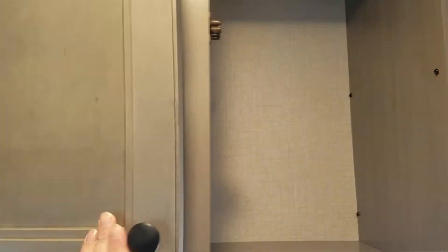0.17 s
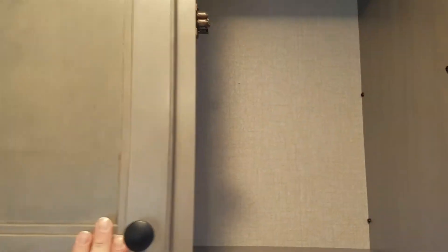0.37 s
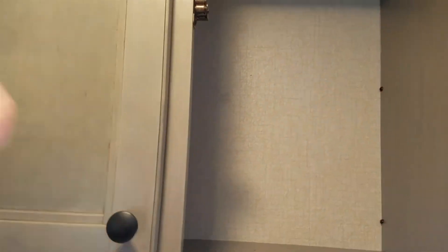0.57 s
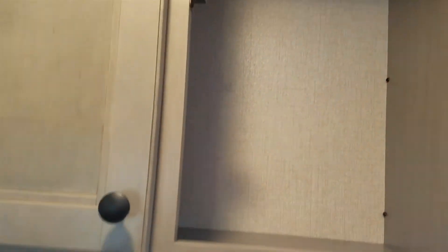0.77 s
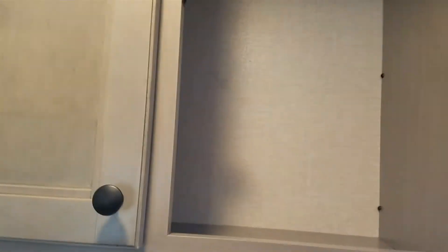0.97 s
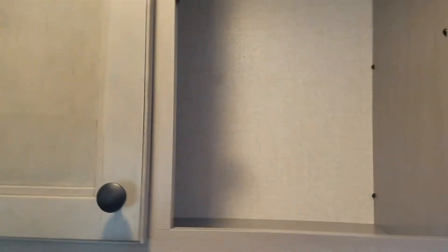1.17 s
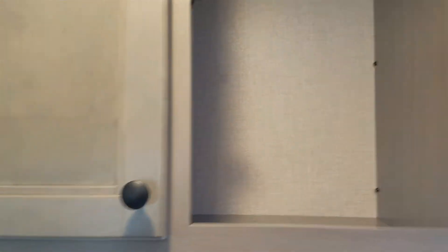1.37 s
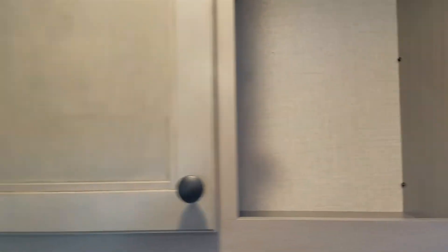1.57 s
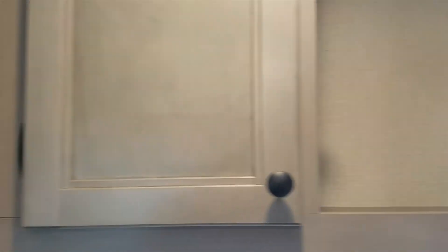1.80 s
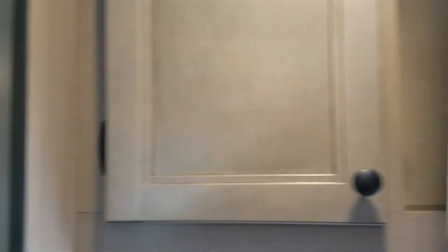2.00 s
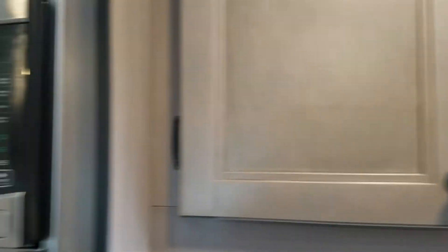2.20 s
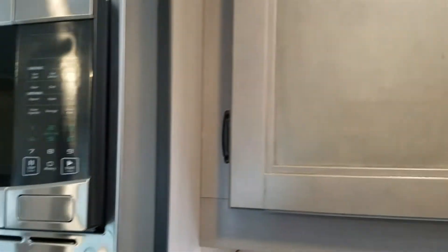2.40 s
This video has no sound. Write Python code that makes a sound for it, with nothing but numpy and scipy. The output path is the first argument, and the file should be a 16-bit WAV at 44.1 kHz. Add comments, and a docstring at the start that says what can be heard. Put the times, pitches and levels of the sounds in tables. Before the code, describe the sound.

Two thin wooden cupboard doors shut about two seconds apart, each a hard, bouncing knock with a catch snap and short room tail, heard close on a handheld phone with handling ticks and soft bumps between.

```python
"""Two cabinet doors in a trailer kitchen

Two light doors are pushed shut close to a hand-held phone. Each snaps into its spring catch, hits the
frame and bounces: decaying panel and catch modes, a noise crack and a room tail, then boom in the thin walls.
Finger clicks are short sine bursts, finger slides grainy noise, soft bumps low swelling sines with a knock.
Shaped noise and wavering bands make the faint room hum; a limiter holds the knocks down."""
import sys
import numpy as np
from scipy import signal
from scipy.fft import rfft, irfft
from scipy.io import wavfile
from scipy.ndimage import uniform_filter1d

SR = 44100
rng = np.random.default_rng(int(sys.argv[2]) if len(sys.argv) > 2 else 0)


def decibels_to_gain(level_db):
    """Convert a level in decibels to a linear amplitude gain (20 dB per decade)."""
    exponent = np.asarray(level_db, float) / 20
    return 10 ** exponent


def master_out(mix):
    """Clip the mix to full scale and print it as 16-bit PCM to the path in sys.argv[1]."""
    frames = np.transpose(np.atleast_2d(mix))
    ceiling = np.clip(frames, -1, 1)
    pcm = np.round(ceiling * 32767).astype(np.int16)
    wavfile.write(sys.argv[1], SR, pcm)


N = 108045  # length in samples

# How alike the two microphone ports hear doors and knocks. Each row: frequency in Hz, likeness from 0 to 1.
DOOR_LIKENESS = [(100, 1), (300, .98), (700, .8), (1500, .5), (3000, .4), (14000, .4)]
# How alike the ports hear room air and finger slides. Each row: frequency in Hz, likeness from 0 to 1.
AIR_LIKENESS = [(60, 1), (150, 0.42), (300, 1), (700, 0.35), (1500, 0.15), (5000, 0.1), (14000, .1)]
DOOR_LAG_S, AIR_LAG_S = 0.00017, 0.00044  # the left port hears later


def evened(x):
    """Scales to rms 1."""
    return x / np.sqrt(np.mean(x ** 2) + 1e-20)


def read(points, hz):
    """Table lookup on a log-frequency axis."""
    f, value = np.transpose(points)
    return np.interp(np.log(hz + 1), np.log(f + 1), value)


def add(mix, start_s, sound):
    """Mixes a sound in at its start time, cut off at the end of the mix."""
    part = mix[..., round(start_s * SR):][..., :sound.shape[-1]]
    part += sound[..., :part.shape[-1]]


def colour(noise, table):
    """Noise given the table's spectrum, rms 1."""
    hz = np.fft.rfftfreq(len(noise), 1 / SR)
    return evened(irfft(rfft(noise) * decibels_to_gain(read(table, hz)), len(noise)))


def ports(a, b, likeness, lag_s):
    """Two microphone ports: the left hears a, the right hears a blended with b, earlier by the lag."""
    hz = np.fft.rfftfreq(len(a), 1 / SR)
    c = np.clip(read(likeness, hz), 0, 1)
    blend = c * rfft(a) + np.sqrt(1 - c ** 2) * rfft(b)
    right = irfft(blend * np.exp(2j * np.pi * hz * lag_s), len(a))
    return np.array([a, right])


def pan(x, db):
    """Left-right balance; positive leans left."""
    return x * decibels_to_gain(np.array([[db / 2], [-db / 2]]))


def resonate(x, hz, width):
    """A resonance applied twice, rms 1; width in Hz is that of one pass."""
    b, a = signal.iirpeak(hz, hz / width, SR)
    twice = signal.lfilter(b, a, signal.lfilter(b, a, x))
    return evened(twice)


def air():
    """Room air is broadband noise; narrow noise bands that waver in level make the hum in it."""
    # Spectrum of the air. Each row: frequency in Hz, relative level in dB per Hz.
    air_tone = [(20, -28), (50, -3), (84, -5.5), (170, -18.5), (350, -4), (480, -10.5), (1140, -11),
                (1350, -15), (2000, -15.5), (4000, -29), (7100, -42), (12000, -62)]
    # Air level between 200 and 3000 Hz, before the port blend. Each row: time in seconds, rms in dB.
    air_level = [(0.0, -48.5), (0.14, -46.5), (0.28, -51), (0.38, -48), (0.57, -52.5), (0.81, -53),
                 (0.93, -49.5), (1.3, -54), (2.01, -50.5), (2.16, -50.5), (2.31, -50), (2.45, -53)]
    # Hum bands. Each row: centre in Hz, width of one filter pass in Hz, level in dB before waver and swell.
    hum_bands = [(79.9, 15, -63.5), (331, 23, -69.5), (591, 38, -76), (875, 270, -71), (1355, 183, -63)]
    # Swell of the hum bands above 500 Hz. Each row: time in seconds, change in dB.
    hum_swell = [(0, -6), (.1, 14), (.17, 16), (.22, -13.5), (.5, 9), (0.618, -18), (.82, -16), (.92, 10),
                 (1.0, -1.5), (1.25, 4), (1.4, -14), (1.58, -8), (1.65, 5.5), (1.8, 12), (1.9, -10),
                 (2.1, -10), (2.3, 13), (2.45, -31)]
    waver_db, waver_s = 3, 0.08  # rms depth, smoothing time
    now = np.arange(N) / SR
    level = np.interp(now, *np.transpose(air_level))
    swell = np.interp(now, *np.transpose(hum_swell))
    wavers = []  # shared by both ports
    for noise in rng.standard_normal((len(hum_bands), N)):
        slow = uniform_filter1d(noise, round(waver_s * SR))
        wavers.append(evened(uniform_filter1d(slow, 1000)))
    middle = signal.butter(4, [200, 3000], "band", fs=SR, output="sos")
    pair = []
    for noise in rng.standard_normal((2, N)):
        bed = colour(noise, air_tone)
        bed = bed / np.std(signal.sosfilt(middle, bed))
        sound = bed * decibels_to_gain(level)
        for (hz, width, db), waver in zip(hum_bands, wavers):
            band_db = db + waver_db * waver + (hz > 500) * swell
            sound = sound + resonate(noise, hz, width) * decibels_to_gain(band_db)
        pair.append(sound)
    return ports(*pair, AIR_LIKENESS, AIR_LAG_S)


def clicks():
    """A finger clicks on the phone: a few cycles at the click's pitch with a sharp noise edge."""
    # Each row: start in seconds, envelope peak in dB before panning, pitch in Hz, left over right in dB.
    click_list = [(0.776, -36, 4540, 28), (0.851, -32, 1300, 12.5), (.975, -45.5, 4830, 12),
                  (0.995, -38, 2680, -13.5), (1.011, -38, 9600, -16), (1.02, -42, 2770, 31),
                  (1.027, -29, 2220, -15), (1.032, -45.5, 6400, -9), (1.0407, -29, 2930, -18),
                  (1.054, -19.5, 2360, -12.5), (1.074, -46, 9800, -2), (2.048, -30.5, 2930, 7),
                  (0.062, -37.5, 2580, -7), (1.546, -44.5, 9200, -4), (2.263, -46.5, 7000, 2)]
    width, edge_db = 0.6, -11  # damping against pitch; edge against the click's level
    out, t = np.zeros((2, N)), np.arange(300) / SR
    for s, db, hz, pan_db in click_list:
        u = np.pi * width * hz * t
        body = np.sin(2 * np.pi * hz * t) * u * np.exp(1 - u)
        edge = decibels_to_gain(edge_db) * rng.standard_normal((2, len(t))) * np.exp(-t / 0.00021)
        add(out, s, decibels_to_gain(db) * pan(body + edge, pan_db))
    return out


def bumps():
    """A soft bump is a low push that swells and dies, with a dull noise knock on top."""
    # Each row: start in seconds, push peak in dB before panning, pitch in Hz, time to the peak in seconds,
    # knock level in dB before its rise and decay, left over right of the push in dB.
    bump_list = [(0.063, -32.5, 68, 0.0057, -40, 2), (0.22, -32.5, 152, 0.0097, -57, 1.5),
                 (0.422, -33, 58.8, 0.029, -65, 1), (0.726, -40, 87, 0.0066, -64, 16),
                 (.778, -37.5, 65, 0.006, -49, 20), (1.031, -47.5, 70, 0.011, -42, -15),
                 (1.23, -39.5, 80.8, 0.023, -40.5, -0.5), (1.262, -42, 84.3, .015, -48, -0.5),
                 (1.436, -35.5, 145, 0.02, -58.5, 1.5), (1.44, -45.5, 326, 0.014, -45, 0),
                 (1.911, -54, 87, 0.019, -45, 0), (1.981, -48, 97, 0.0058, -32.5, 2),
                 (2.025, -34, 61, 0.016, -55, -1.5), (2.188, -45, 55.3, 0.027, -65, 1),
                 (2.4, -47, 51.4, 0.033, -47.5, 0)]
    # Spectrum of the knock. Each row: frequency in Hz, relative level in dB per Hz.
    knock_tone = [(88, -22), (150, -6), (492, -7), (1540, -14), (2010, -12.5), (2530, -22.5), (2860, -23.5),
                  (6000, -42.5), (7800, -83.5), (13200, -120)]
    knock_t60_s, knock_rise_s = 0.17, 0.0012
    out, t = np.zeros((2, N)), np.arange(SR // 4) / SR
    for s, db, hz, peak_s, knock_db, pan_db in bump_list:
        swell = t / peak_s * np.exp(1 - t / peak_s)
        push = np.sin(2 * np.pi * hz * t) * decibels_to_gain(db) * swell
        a, b = (colour(noise, knock_tone) for noise in rng.standard_normal((2, len(t))))
        shape = decibels_to_gain(knock_db - 60 * t / knock_t60_s) * (1 - np.exp(-t / knock_rise_s))
        knock = ports(a, b, DOOR_LIKENESS, DOOR_LAG_S) * shape
        add(out, s, pan(push, pan_db) + knock)
    return out


def ring(modes, t, rise_s, spread_db=1.5):
    """Decaying modes after one blow; random mode levels and signs make each blow a little different."""
    hz, db, t60 = np.transpose(modes)[:, :, None]
    luck = rng.standard_normal((len(modes), 2))
    wave = np.sin(2 * np.pi * hz * t) * np.sign(luck[:, :1])
    decay = decibels_to_gain(db + spread_db * luck[:, 1:] - 60 * t / t60)
    return (decay * wave).sum(0) * (1 - np.exp(-t / rise_s))


def room(x):
    """Direct sound and a dense tail whose bands die at their own speed, heard by both ports."""
    # Decay of the room. Each row: frequency in Hz, time to fall 60 dB in seconds.
    room_t60 = [(100, 0.28), (260, 0.34), (700, 0.26), (1840, 0.31), (4850, 0.24), (12800, 0.23)]
    # Tail against direct sound. Each row: frequency in Hz, level in dB.
    tail_send = [(60, -16), (250, -7.5), (700, -4), (2000, -3.5), (6000, -2.5), (15000, -6)]
    # Balance of the doors at the microphone. Each row: frequency in Hz, left over right in dB.
    door_balance = [(60, 1), (110, 0.5), (200, 0.0), (380, -0.5), (700, 0.0), (1290, 1), (2380, -4),
                    (4400, 0.5), (8120, 1.5), (15000, -2)]
    size = SR // 2
    hz, t, z = signal.stft(rng.standard_normal((2, size)), SR, nperseg=256)
    t60 = read(room_t60, hz)[:, None]
    decay = decibels_to_gain(read(tail_send, hz)[:, None] - 60 * t / t60)
    z = z * decay * np.sqrt(6 * np.log(10) / (t60 * SR))  # long and short decays carry equal energy
    fade_in = np.minimum(np.arange(size) / (0.0032 * SR), 1)
    tail = signal.istft(z, SR, nperseg=256)[1][:, :size] * fade_in
    wet = x + signal.fftconvolve(x[:1], tail, axes=1)[:, :N]  # the first row feeds both tails
    a, b = np.pad(wet, ((0, 0), (0, 4096)))
    balance_db = read(door_balance, np.fft.rfftfreq(len(a), 1 / SR))
    tilt = decibels_to_gain(np.outer([0.5, -0.5], balance_db))
    heard = ports(a, b, DOOR_LIKENESS, DOOR_LAG_S)
    return irfft(rfft(heard) * tilt, len(a))[:, :N]


def doors():
    """Every blow rings panel and spring catch and cracks; each door has a room tail of its own."""
    # Blows of each door. Each row: start in seconds, panel, catch and crack gain in dB.
    first_blows = [(.2295, -11.5, -37.5, -11.5), (.2325, -6, -61.5, -11.5), (.249, -7, -25, -6),
                   (.266, -9, -47, -42), (.284, -12.5, -52.5, -24), (.302, -16, -43, -35),
                   (.311, -17.5, -60.5, -36.5), (.327, -22, -46, -47)]
    second_blows = [(2.0895, -30, -18.5, -10.5), (2.098, -24, -35, -16.5), (2.1095, -13, -21, -14),
                    (2.1175, -11.5, -41, -9), (2.125, -12, -55, -20), (2.144, -15.5, -56, -26),
                    (2.153, -15, -56, -20.5)]
    # Panel modes. Each row: frequency in Hz, level in dB before blow gain and spread, t60 in seconds.
    first_panel = [(98.9, -4, 0.21), (116.5, 2, 0.09), (178.6, -10, 0.28), (233.7, -2, 0.31),
                   (305, -10.5, 0.16), (390.5, -14.5, 0.22), (527, -3, 0.033), (661, -9.5, 0.12),
                   (836.6, -8.5, 0.091), (1080, -28, 0.065), (1300, -27, 0.041), (2008, -32.5, 0.077),
                   (2455, -11.5, 0.021)]
    second_panel = [(143.3, 0, 0.09), (214, -17, 0.22), (325.2, 1, 0.12), (369, -1, 0.086),
                    (419.6, -2.5, 0.083), (553, 2, 0.052), (602.6, -3.5, 0.097), (647, -8, 0.092),
                    (807, -6.5, 0.1), (894, -15.5, 0.12), (1125, -35, .06), (1404, -27, 0.059),
                    (1900, -15, 0.064)]
    # Modes of the spring catch. Each row: frequency in Hz, level in dB as above, t60 in seconds.
    catch_modes = [(4164, 6, 0.017), (5480, -6.5, 0.01), (8000, -10.5, 0.017), (10570, -16, 0.009)]
    # Spectrum of each crack against the frame. Each row: frequency in Hz, relative level in dB per Hz.
    first_crack = [(120, -31), (200, 3.5), (420, -22.5), (849, -9.5), (1040, -13), (1880, -15),
                   (3230, -23.5), (4030, -27), (8610, -50.5), (15000, -37.5), (16800, -64)]
    second_crack = [(120, -33), (200, -12), (369, -8), (692, -11), (1300, -8), (1510, -12), (2890, -18),
                    (4180, -23.5), (8940, -46), (15000, -42), (16800, -52)]
    panel_rise_s, catch_rise_s = 0.002, 0.0001
    crack_rise_s, crack_t60_s, crack_grain_db = 0.00059, 0.055, 1.5
    out, t = np.zeros((2, N)), np.arange(SR // 2) / SR
    crack_shape = decibels_to_gain(-60 * t / crack_t60_s) * (1 - np.exp(-t / crack_rise_s))
    both_doors = ((first_blows, first_panel, first_crack), (second_blows, second_panel, second_crack))
    for blows, panel_modes, crack_tone in both_doors:
        door = np.zeros((2, N))  # main sound, and the part blended into the right port
        for s, panel_db, catch_db, crack_db in blows:
            grain = decibels_to_gain(crack_grain_db * rng.exponential(1, len(t)))
            grains = rng.standard_normal((2, len(t))) * grain
            crack = np.array([colour(noise, crack_tone) for noise in grains])
            crack = crack * decibels_to_gain(crack_db) * crack_shape
            panel = decibels_to_gain(panel_db) * ring(panel_modes, t, panel_rise_s) * [[1], [0]]  # main row only
            catch = decibels_to_gain(catch_db) * ring(catch_modes, t, catch_rise_s)
            add(door, s, panel + catch + crack)
        out = out + room(door)
    return out


def booms():
    """The thin walls shake after each door: low resonant noise that dies away."""
    # Each row: start in seconds, level in dB before rise and decay, pitch in Hz, t60 in seconds.
    boom_list = [(.235, -27, 66, 1.53), (2.101, -30, 57, 0.74)]
    width_hz = 85  # of one filter pass
    out, t = np.zeros(N), np.arange(SR) / SR
    for s, db, hz, t60 in boom_list:
        shake = resonate(rng.standard_normal(SR), hz, width_hz)
        shape = decibels_to_gain(db - 60 * t / t60) * (1 - np.exp(-t / 0.005))
        add(out, s, shake * shape)
    return out


def slides():
    """Skin rubs on the phone: a grainy hiss, rising and fading."""
    # Each row: start in seconds, rise in seconds, time to fade by 14 dB in seconds, level in dB before
    # shape and panning, left over right in dB, brightness in dB per octave.
    slide_list = [(0.7752, 0.00072, 0.082, -44, 10.5, 2), (0.854, 0.0012, 0.013, -43.5, 12, 1),
                  (0.966, 0.0091, 0.038, -58.5, 4, 7.5), (1.002, 0.01, 0.058, -42, 2, -3.5),
                  (1.53, 0.019, 0.07, -43, 3.5, -1.5), (1.981, .003, 0.11, -45.5, 3, -3),
                  (2.039, 0.015, 0.055, -45.5, 3, 0)]
    # Spectrum of rubbing before the brightness. Each row: frequency in Hz, relative level in dB per Hz.
    slide_tone = [(300, -14), (700, 0), (1500, -1.5), (3000, -1.5), (6000, -11), (9000, -25), (12000, -27),
                  (16000, -28)]
    grain_db = 2.5
    out = np.zeros((2, N))
    for s, rise_s, length_s, db, pan_db, bright_db in slide_list:
        t = np.arange(0, 2 * length_s, 1 / SR)
        tone = [(hz, level + bright_db * np.log2(hz / 3000)) for hz, level in slide_tone]
        pair = []
        for _ in range(2):
            grain = decibels_to_gain(grain_db * rng.exponential(1, len(t)))
            pair.append(colour(rng.standard_normal(len(t)) * grain, tone))
        shape = np.minimum(t / rise_s, 1) * decibels_to_gain(-14 * (t / length_s) ** 2)
        rub = shape * ports(*pair, AIR_LIKENESS, AIR_LAG_S)
        add(out, s, decibels_to_gain(db) * pan(rub, pan_db))
    return out


def scene():
    """All sources in the kitchen."""
    return air() + clicks() + bumps() + doors() + booms() + slides()


def hiss(shape):
    """Microphone hiss: steady noise, independent in each port."""
    # Each row: frequency in Hz, relative level in dB per Hz.
    hiss_tone = [(3000, -12), (7000, -8), (10000, -3), (13000, 1.5), (15500, 4.5), (17000, -3)]
    return decibels_to_gain(-72) * np.array([colour(noise, hiss_tone) for noise in rng.standard_normal(shape)])


def limit(x):
    """Turns both ports down by a share of the excess of a held level, which falls back steadily."""
    limit_db, share, fall_db_per_s = -9.5, 0.38, 204  # the fall is that of the held level
    power = uniform_filter1d((x ** 2).mean(0), 300)
    power_db = 10 * np.log10(abs(power) + 1e-12)
    fall = np.arange(N) * fall_db_per_s / SR
    held_db = np.maximum.accumulate(power_db + fall) - fall
    over_db = np.maximum(held_db - limit_db, 0)
    return x / decibels_to_gain(share * uniform_filter1d(over_db, 100))


def top_cut(x):
    """Nothing passes above the cut-off."""
    return signal.sosfilt(signal.butter(12, 16940, fs=SR, output="sos"), x)


def record(dry):
    """The phone adds hiss, limits, clips at full scale and cuts the treble above 15900 Hz."""
    held = np.clip(limit(dry + hiss(dry.shape)), -1, 1)
    low_pass = signal.firwin(255, 15900, window=("kaiser", 6), fs=SR)
    mix = signal.oaconvolve(held, low_pass[None], "same")
    return top_cut(mix)


dry = scene()
out = record(dry)
master_out(out)
```